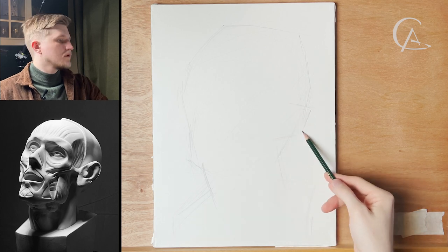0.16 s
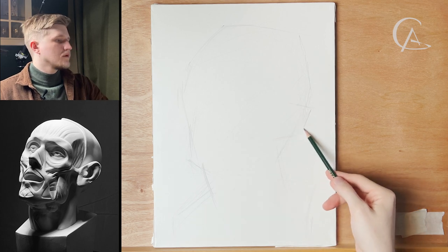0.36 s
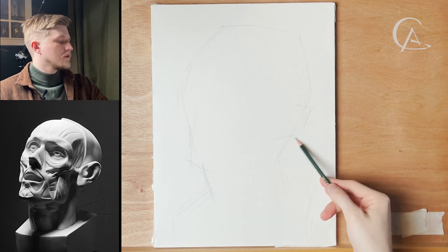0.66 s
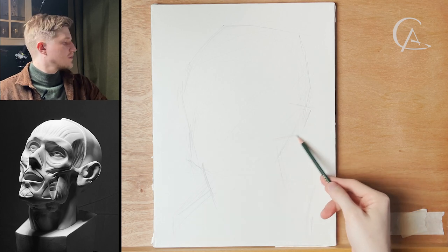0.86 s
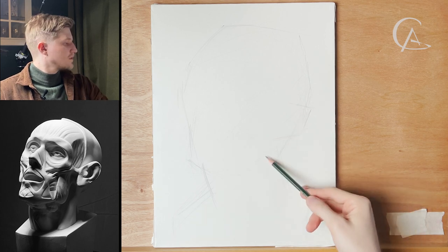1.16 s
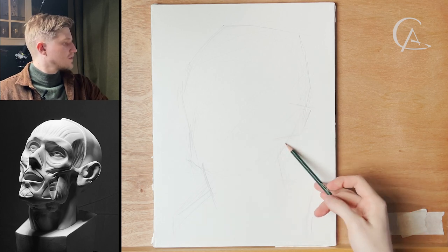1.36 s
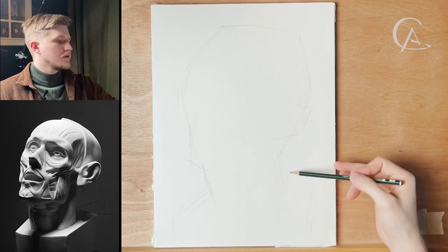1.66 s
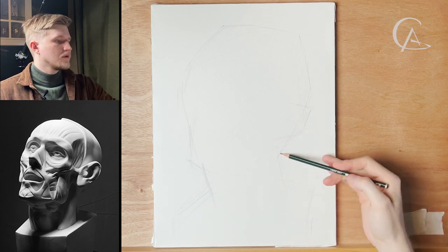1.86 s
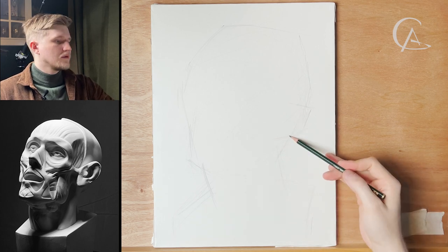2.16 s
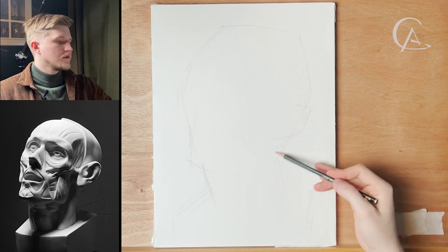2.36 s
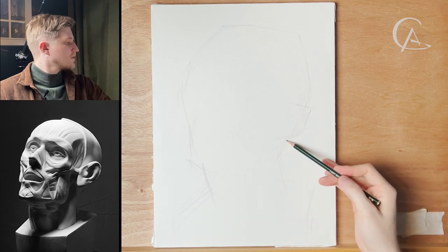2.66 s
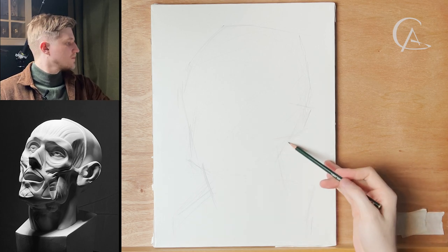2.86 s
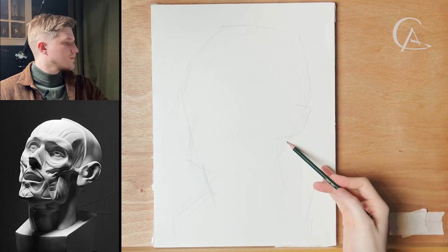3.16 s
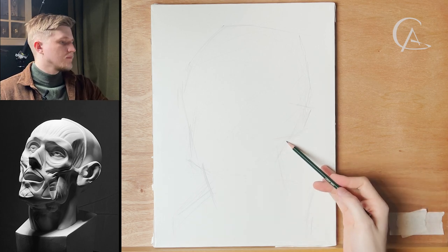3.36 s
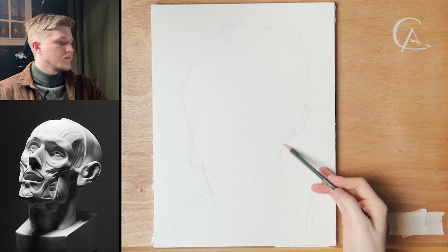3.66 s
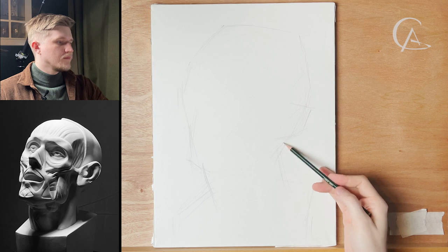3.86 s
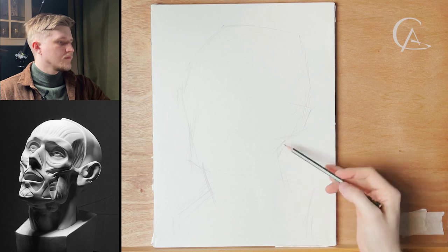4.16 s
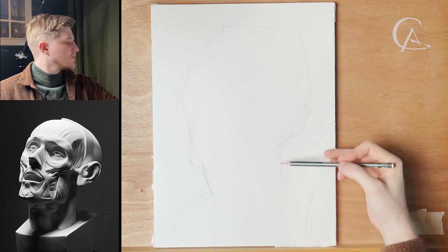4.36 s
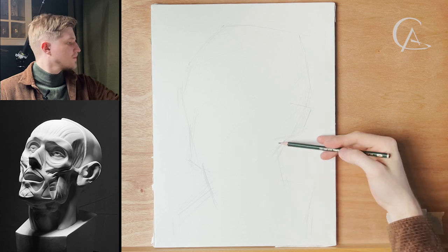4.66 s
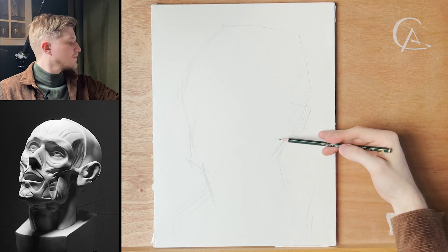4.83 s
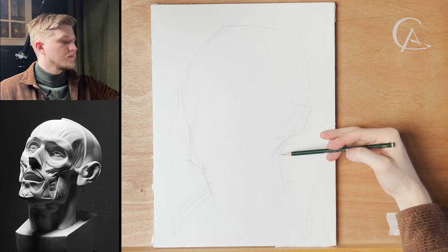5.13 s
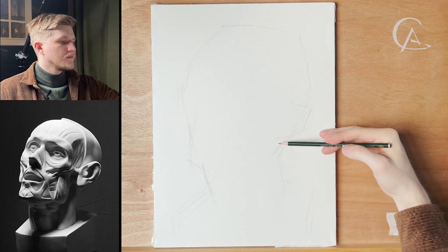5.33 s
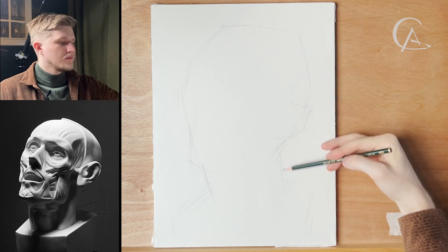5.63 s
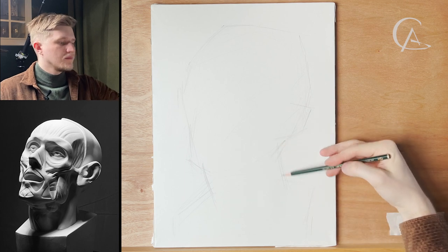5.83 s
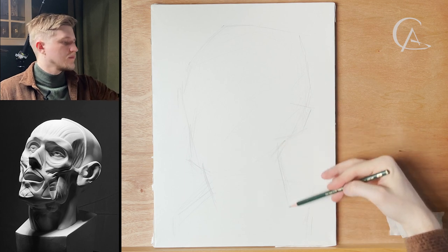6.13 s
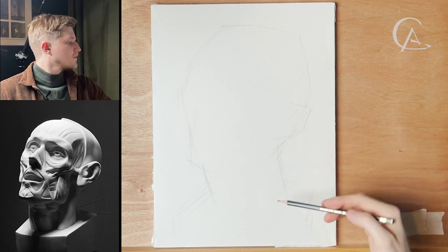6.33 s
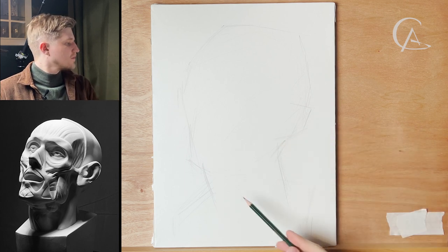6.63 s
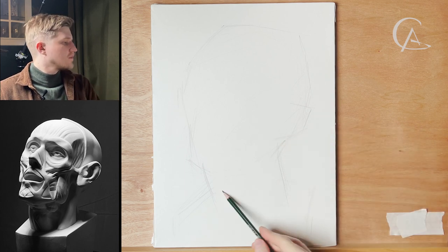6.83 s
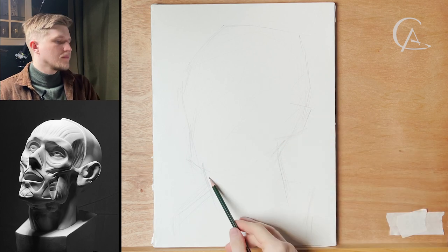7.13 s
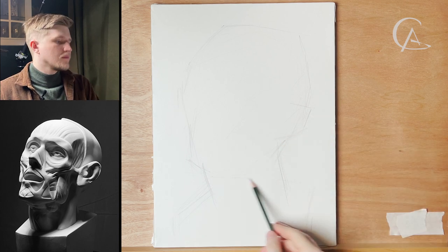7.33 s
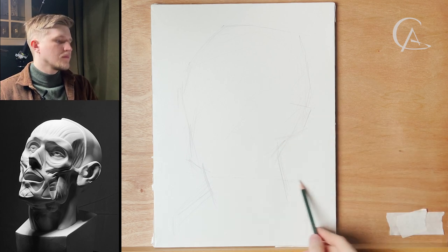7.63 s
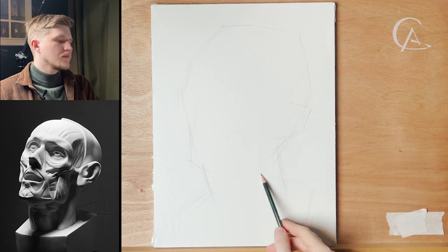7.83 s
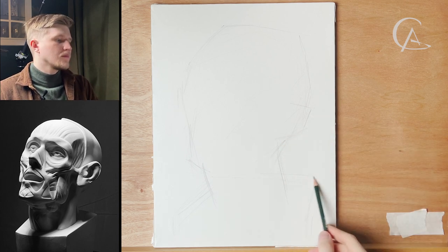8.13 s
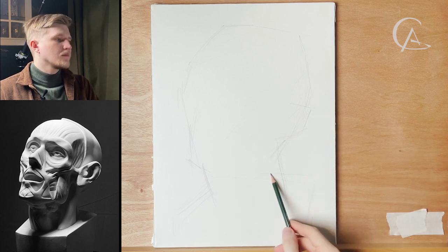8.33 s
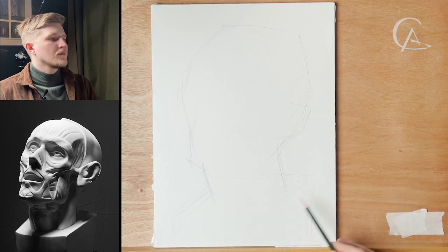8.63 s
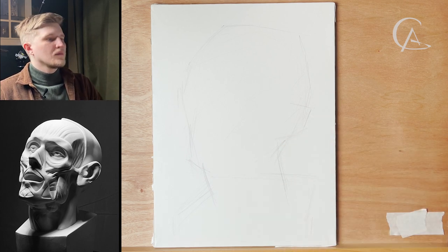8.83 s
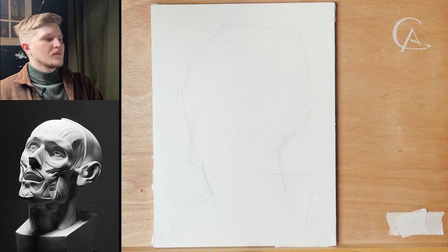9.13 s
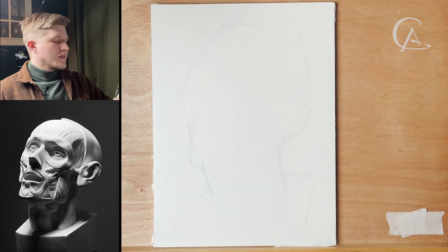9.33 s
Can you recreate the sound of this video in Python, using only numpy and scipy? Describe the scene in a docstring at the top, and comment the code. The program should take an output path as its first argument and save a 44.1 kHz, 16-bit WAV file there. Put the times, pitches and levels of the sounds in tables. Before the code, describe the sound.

A pencil sketches on paper over a wooden board in quick dry strokes with pauses, then clacks on wood and rattles briefly, over a faint low hum.

```python
"""In a quiet room, a pencil sketches on paper fixed to a wooden board, close to a small microphone.
The lead hisses over fine fibres, drums the board as it rides coarser bumps, and ticks where it lands or catches.
The hand bumps the board once, the sleeve slides over it and at the end slides off; one long faint hiss comes early.
Near the end the pencil clacks on wood and rattles to rest. Room noise and low beating hums lie underneath.
Friction is made of random tiny snaps, knocks are short bursts and ringing tones, and hums are plain tones."""
import sys
import numpy as np
from scipy import signal
from scipy.io import wavfile
from scipy.ndimage import uniform_filter1d, map_coordinates

SR = 44100
rng = np.random.default_rng(int(sys.argv[2]) if len(sys.argv) > 2 else 0)


def file_out(sig):
    """Save sig as 16-bit WAV at sys.argv[1]."""
    # one column per channel
    cols = np.atleast_2d(sig).T
    # limit, then scale
    lim = np.clip(cols, -1, 1)
    pcm = np.round(lim * 32767).astype(np.int16)
    wavfile.write(sys.argv[1], SR, pcm)


N = 418509
TIME = np.arange(N) / SR
# Table levels are relative unless marked otherwise: each function also sets the level of its whole layer.


def pencil(chatter_db=1.5, chatter_hz=220, ring_db=-44, upright_db=8):
    """The lead catches and lets go all the time, and its push on the wood makes the board ring."""
    (hiss, rasp, drum), speed, upright = hand_motion()
    push = board_drumming(drum, speed, upright)
    at_paper = lead_hiss(hiss) + lead_scratch(rasp, speed) + push + shaft_ringing(drum, speed, upright)
    grip = gain_of(chatter_db * drift(chatter_hz))
    # an upright pencil drives the board's modes harder
    drive = grip * push * gain_of(upright_db * upright)
    return grip * at_paper + gain_of(ring_db) * through(drive, board_ring())


# strokes of the pencil: (start [s], length [s], fastest at [share of length], leans hardest at [share of length],
# hiss level [dB], rasp level [dB], drumming level [dB],
# top speed [1000 = bumps heard at the pitch of their table], tilt [0 flat to 1 upright])
STROKES = [(0.426, 0.11, 0.43, .68, -42.5, -50, -61, 759, .5),
           (0.517, 0.11, 0.63, 0.57, -46, -53.5, -62.5, 703.6, 0.78),
           (0.621, 0.097, 0.52, 0.77, -42.5, -51, -54.5, 750, .4),
           (0.708, 0.12, 0.59, 0.4, -45.5, -47, -53.5, 601, 0.5),
           (0.83, .1, 0.44, 0.66, -41, -52, -48.5, 680.5, 0.62),
           (0.916, 0.11, 0.62, 0.18, -39.5, -47, -54.5, 636.8, 0.36),
           (1.025, 0.14, 0.44, 0.48, -33.5, -42.5, -36, 929.8, 0.55),
           (1.803, 0.06, 0.61, 0.53, -35.5, -37, -50.5, 650.5, 0.8),
           (1.897, 0.063, 0.56, 0.59, -45, -46.5, -58, 744, 0.77),
           (2.185, 0.16, 0.33, 0.47, -45, -48.5, -43.5, 961, 0.89),
           (3.636, .137, 0.51, 0.5, -40, -51, -41, 920.6, 0.096),
           (3.763, .17, 0.5, 0.49, -43.5, -59, -42, 781, 0.12),
           (3.945, .11, .36, 0.37, -41, -53, -37, 850.3, 0.18),
           (5.468, .315, 0.47, 0.39, -39.5, -58.5, -40.5, 941, .1),
           (5.746, .225, .58, 0.58, -39.5, -58, -40.5, 881.6, .1),
           (5.967, 0.23, 0.38, 0.41, -38, -55, -36.5, 1058, .3),
           (7.16, 0.39, .55, 0.6, -38, -42, -47, 879.7, 1),
           (7.663, .17, 0.15, 0.26, -44, -46, -51, 800, 0.84),
           (7.849, 0.25, 0.47, .35, -41, -51, -40.5, 967.4, 0.49),
           (8.113, 0.21, 0.36, 0.71, -44.5, -49.5, -47, 827, 0.64),
           (8.341, 0.21, 0.63, 0.52, -41.5, -51.5, -44, 940, 0.67)]
# light touches and brief extra presses of the lead:
# (start [s], length [s], hiss level [dB], rasp level [dB], drumming level [dB])
TOUCHES = [(-.03, 0.047, -43, -52.5, -57.5), (0.004, 0.17, -64.5, -62.5, -74.5),
           (1.267, 0.1, -80, -66, -80), (1.477, 0.079, -95, -99, -71), (2.239, 0.037, -60, -74, -43),
           (2.638, 0.09, -80, -64.5, -65.5), (2.918, 0.063, -76, -63, -66.5),
           (3.122, 0.047, -81, -60.5, -67.5), (4.48, 0.12, -73, -75, -83), (4.62, 0.13, -79, -75, -72.5),
           (4.724, 0.22, -91, -77.5, -78), (6.779, 0.059, -46.5, -51.5, -73),
           (6.857, 0.11, -56, -64.5, -73), (6.91, 0.053, -53, -59.5, -82), (7.389, 0.075, -70, -62, -43),
           (8.511, 0.034, -59, -46, -83)]


def hand_motion(touch_speed=0.95, touch_tilt=0.99, touch_crest=0.39):
    """Each stroke is one swing and one lean of the hand: gives the three strengths, the speed and the tilt."""
    hiss_power, rasp_power, drum_power = 1.29, 1.45, 1.8
    end_speed = 0.5  # share of the top speed left at either end of a stroke
    force = np.zeros((3, N))
    speed, tilt = np.full(N, touch_speed), np.full(N, touch_tilt)
    for start, length, fastest, hardest, *levels, top_speed, upright in STROKES:
        on, pace = swing(start, length, fastest)
        lean = swing(start, length, hardest)[1]
        shapes = [pace ** hiss_power, pace ** rasp_power, lean ** drum_power]
        force[:, on] += gain_of(levels)[:, None] * shapes
        speed[on] = top_speed / 1000 * (end_speed + (1 - end_speed) * pace)
        tilt[on] = upright
    for start, length, *levels in TOUCHES:
        on, pace = swing(start, length, touch_crest)
        force[:, on] += gain_of(levels)[:, None] * pace
    return force, speed, tilt


# fine fibres of the paper: (frequency [Hz], level [dB])
FIBRES = [(2000, -50), (5500, -41), (7800, -1.5), (12000, 7.5), (16000, 2.5)]


def lead_hiss(strength, hiss_db=-5):
    """The lead snaps over fine fibres, which makes a bright hiss."""
    return gain_of(hiss_db) * strength * patchy(friction(FIBRES), 3, 500, 0.025)


# rasp of the lead: (frequency [Hz], level [dB])
RASP = [(1500, -30.5), (3000, -11.5), (4200, -10.5), (5200, -4), (7000, -8.5), (12000, -15)]
# rubbing, for lead or cloth: (frequency [Hz], level [dB])
RUB = [(60, -50.5), (330, -0.5), (1250, -9.5), (1750, -1.5), (2900, -18), (4500, -12.5), (10000, -13)]


def lead_scratch(strength, speed, rasp_db=-1, scrape_db=-5):
    """The lead rasps, and fast strokes add a coarser scrape below it."""
    rasp = gain_of(rasp_db) * patchy(friction(RASP), 3.5, 700, 0.03)
    scrape = gain_of(scrape_db) * speed ** 2 * patchy(friction(RUB), 4, 450, 0.03)
    return strength * (rasp + scrape)


# coarser bumps of the paper, as heard at speed 1000: (frequency [Hz], level [dB])
BUMPINESS = [(130, -27), (330, -11.5), (750, 0), (1550, -4), (2100, -15), (4200, -33)]


def board_drumming(strength, speed, upright, drum_db=1, flat_hz=420, upright_hz=260):
    """The lead rides the coarser bumps and pushes the board; the faster it moves, the higher the pitch."""
    relief = patchy(friction(BUMPINESS, spread_db=2.6), 4.5, 260, 0.035)
    # the bumps are read at the distance that the lead has travelled
    distance = np.cumsum(speed) % (N - 1)
    ride = gain_of(drum_db) * strength * map_coordinates(relief, [distance])
    # a flat pencil passes less bass into the board
    share = np.clip(upright, 0, 1)
    return (1 - share) * without_bass(ride, flat_hz) + share * without_bass(ride, upright_hz)


# bending resonance of the pencil's shaft: (frequency [Hz], level [dB])
SHAFT = [(2000, -30), (2750, 0), (3900, -26)]


def shaft_ringing(strength, speed, upright, shaft_db=-12, upright_loss_db=7.5):
    """Hard, fast strokes set the shaft ringing, and a flat pencil rings more than an upright one."""
    level = gain_of(shaft_db - upright_loss_db * upright)
    return level * strength * speed ** 3 * patchy(friction(SHAFT), 5, 260, 0.035)


# the lead lands or catches: (time [s], level [dB], board knock compared with the tick [dB])
TICKS = [(1.278, -42, -23), (1.3587, -43, -42), (1.7619, -42, 7.5), (1.8436, -25.5, -14),
         (2.1264, -47.5, 9), (2.919, -38, 0), (4.6176, -42.5, 5), (5.399, -58, -20.5), (6.5211, -48, 7.5),
         (6.785, -27, 4.5), (7.136, -48.5, -18), (7.665, -28.5, -36), (8.5284, -31.5, -5)]
# sharp tick of the lead: (frequency [Hz], level [dB])
TICK_COLOUR = [(300, -19.5), (2500, 0), (5200, 1.5), (16000, -10)]


def lead_ticks(tick_db=-5, knock_db=-19):
    """Each sharp catch of the lead ticks and also knocks the board, which rings."""
    times, db, knock = np.transpose(TICKS)
    ticks = through(blows(times, db + tick_db), skid(TICK_COLOUR))
    return ticks + through(blows(times, db + knock + knock_db), board_ring())


# the pencil clacks against wood and rebounds: (time [s], level [dB])
CLACKS = [(8.937, -18), (8.944, -28)]
# sharp clack on wood: (frequency [Hz], level [dB])
CLACK_COLOUR = [(600, -45), (1800, 1), (2700, 9.5), (4200, -8), (5200, 8.5), (6500, -2), (8500, 9.5),
                (16000, -12)]


def pencil_clacks(clack_db=-1):
    """The pencil strikes wood and skids for a moment at each contact."""
    return gain_of(clack_db) * through(blows(*np.transpose(CLACKS)), skid(CLACK_COLOUR))


# dying rattle, bright part then woody part: (level at the first clack [dB], time to fall by 60 dB [s])
RATTLE = [(-33.5, 0.23), (-40.5, 0.52)]
# scraped wood: (frequency [Hz], level [dB])
WOOD = [(500, -14.5), (1350, -4.5), (1700, 1.5), (2050, -1.5), (2500, -1), (3300, -3.5), (4100, -6),
        (9000, -34)]


def rattle(rub_db=-2):
    """After the clack the pencil chatters to rest on the wood; the treble dies first."""
    age = TIME - CLACKS[0][0]
    bright, woody = (gain_of(db - 60 * np.maximum(age, 0) / t60) * (age > 0) for db, t60 in RATTLE)
    wood = patchy(friction(WOOD) + gain_of(rub_db) * friction(RUB), 4, 170, 0.12)
    return bright * friction(FIBRES) + woody * wood


# two contacts of the hand's one bump: (time [s], level [dB])
BUMPS = [(6.785, -38.5), (6.802, -33)]


def hand_bump(soft_hz=280, hand_damping=1.64):
    """A soft hand mostly excites the lowest modes of the board and damps them as it lies there."""
    soften = signal.butter(2, soft_hz, fs=SR, output="sos")
    flesh = signal.sosfilt(soften, blows(*np.transpose(BUMPS)))
    return through(flesh, board_ring(damping=hand_damping))


# natural tones of the board: (frequency [Hz], level [dB], time to fall by 60 dB undamped [s])
BOARD = [(174.6, -3, 0.16), (229.3, -6.5, 0.26), (272.2, 8, 0.087), (338.3, -6, 0.22), (460.4, -12, 0.093),
         (766.6, -14, 0.032)]


def board_ring(lowest_hz=150, damping=1):
    """The board answers a blow with dying tones; damping shortens them."""
    t = np.arange(SR // 2) / SR
    ring = np.zeros(len(t))
    for hz, db, t60 in BOARD:
        ring += gain_of(db - 60 * t * damping / t60) * np.sin(2 * np.pi * hz * t)
    return without_bass(ring, lowest_hz)


# slides of the sleeve over the board, except the first row, which is a long faint hiss around 2 kHz:
# (start [s], length [s], fastest or loudest at [share of length],
# swish level [dB], rub level [dB], scrape level on the wooden edge [dB])
SLIDES_AND_FAINT_HISS = [(1.646, 2.5, 0.17, -96, -96, -75.5), (6.492, 0.11, 0.63, -80, -61.5, -53.5),
                         (6.519, 0.051, 0.13, -44, -50, -58), (8.556, 0.54, 0.57, -47, -60, -60),
                         (8.988, 0.15, .4, -67, -56, -60.5), (9.074, 0.9, 0.28, -83, -69.5, -69.5),
                         (9.315, .11, 0.7, -55, -56, -68), (9.393, 0.086, 0.48, -80, -86, -59.5)]


def sleeve_and_faint_hiss(swish_db=-5, swish_power=4.1):
    """Cloth swishes, rubs the board and scrapes its wooden edge; a long faint hiss shares the scrape's sound."""
    force = np.zeros((3, N))
    for start, length, crest, *levels in SLIDES_AND_FAINT_HISS:
        on, pace = swing(start, length, crest)
        # the swish grows more steeply with speed than the rub
        force[:, on] += gain_of(levels)[:, None] * [pace ** swish_power, pace, pace]
    swish, rub, scrape = force
    catches = patchy(friction(RUB, per_s=4000, spread_db=3.8), 2.5, 170, 0.12)
    edge = patchy(friction(WOOD, per_s=4000, spread_db=3), 4, 170, 0.12)
    return gain_of(swish_db) * swish * friction(FIBRES) + rub * catches + scrape * edge


# echo of the room: (frequency [Hz], time to fall by 60 dB [s])
ROOM = [(150, 0.33), (2000, 0.21), (12000, 0.17)]


def room(x, gap_s=0.0039):
    """Dense reflections of a small room, each band dying at its own speed."""
    hz, t, z = signal.stft(rng.standard_normal(SR // 2), SR, nperseg=256)
    fade = gain_of(-60 * t / read(ROOM, hz)[:, None])
    tail = signal.istft(z * fade, SR, nperseg=256)[1]
    # silent for one gap, then growing to full over another
    tail = tail * np.clip(np.arange(len(tail)) / SR / gap_s - 1, 0, 1)
    return through(x, tail / np.linalg.norm(tail))


# noise of the quiet room: (frequency [Hz], level [dB])
AIR = [(20, -14.5), (68, -4), (125, 0.5), (300, -2), (430, -10.5), (650, -11), (850, -23), (1250, -17),
       (1700, -32), (16000, -38.5)]


def room_noise(air_db=-66):
    """Soft shaped noise whose level wanders a little."""
    air = evened(through(rng.standard_normal(N), response(AIR)))
    return gain_of(air_db) * air * gain_of(drift(2.1))


# low steady hums, and one faint higher tone of the room: (frequency [Hz], rms level [dB])
HUMS = [(100.0, -61.5), (97.57, -64.5), (48.8, -77), (342, -70)]


def hums(in_step_s=0.17, waver_rad=0.12):
    """Steady tones with slightly wavering phase; the closest two swell together and cancel in turn."""
    total = np.zeros(N)
    for hz, db in HUMS:
        phase = 2 * np.pi * hz * (TIME - in_step_s) + waver_rad * drift(4)
        total += gain_of(db) * np.sqrt(2) * np.cos(phase)
    return total


def friction(colour, per_s=9000, spread_db=1.0):
    """Tiny snaps: random in time, mostly small, a few large."""
    size = gain_of(spread_db * np.minimum(rng.exponential(1, N), 4.5))
    snaps = size * rng.choice([-1, 1], N) * (rng.random(N) < per_s / SR)
    return evened(through(snaps, response(colour)))


def patchy(x, depth_db, width_hz, length_s):
    """Uneven surface: each moment favours other pitches, at about the same power."""
    z = signal.stft(x, SR, nperseg=512)[2]
    field = rng.standard_normal(z.shape)
    # smooth the chance over patches so wide in pitch and so long in time
    for axis, span in enumerate((width_hz * 512 / SR, length_s * SR / 256)):
        field = uniform_filter1d(field, max(1, round(span)), axis)
    z = z * gain_of(depth_db * evened(field))
    power = uniform_filter1d((abs(z) ** 2).sum(0), size=3)
    return evened(signal.istft(z / np.sqrt(power + 1e-12), SR)[1][:N])


def swing(start, length, crest):
    """A smooth rise and fall: the samples of one movement, and an arch from 0 to 1 and back."""
    on = (TIME > start) & (TIME < start + length)
    # bend time so that the arch tops at the crest
    skew = np.log(0.5) / np.log(np.clip(crest, 0.05, 0.95))
    return on, abs(np.sin(np.pi * ((TIME[on] - start) / length) ** skew))


def skid(colour):
    """A contact skids for a moment: a short dying noise with this spectrum and a peak of 1."""
    t = np.arange(SR // 50) / SR
    burst = rng.standard_normal(len(t)) * np.exp(-t / 0.0018)
    shaped = signal.fftconvolve(burst, response(colour))
    return shaped / abs(shaped).max()


def blows(times, db):
    """One impulse for each blow."""
    out = np.zeros(N)
    out[np.round(np.asarray(times) * SR).astype(int)] = gain_of(db)
    return out


def without_bass(x, edge_hz):
    """A small board radiates little below its lowest modes."""
    return signal.sosfilt(signal.butter(2, edge_hz, "high", fs=SR, output="sos"), x)


def drift(rate_hz):
    """Random wandering of rms 1, with a new target this many times a second."""
    knots = rng.standard_normal(N // 20)
    return evened(np.interp(TIME * rate_hz, np.arange(len(knots)), knots))


def gain_of(db):
    """Decibels to amplitude."""
    return 10 ** (np.asarray(db) / 20)


def evened(x):
    """Scales to rms 1."""
    return x / np.sqrt(np.mean(x ** 2) + 1e-20)


def read(points, hz):
    """Reads a table on a log-frequency axis."""
    f, value = np.transpose(points)
    return np.interp(np.log(hz + 1), np.log(f + 1), value)


def response(points, size=4096):
    """The impulse response that has this spectrum and never starts before its cause."""
    log_gain = np.log(gain_of(read(points, abs(np.fft.fftfreq(size, 1 / SR)))))
    return np.fft.ifft(np.exp(np.conj(signal.hilbert(log_gain)))).real[:size // 2]


def through(x, impulse):
    """Convolves and keeps the scene's length."""
    return signal.oaconvolve(x, impulse)[:N]


def scene(room_db=-8):
    """The near sounds, their echo, and the quiet room."""
    near = pencil() + lead_ticks() + pencil_clacks() + hand_bump() + rattle() + sleeve_and_faint_hiss()
    # the sound feeds two different echoes in turn, in a cycle of one second
    turn = 2 * np.pi * TIME
    echo = room(near * np.cos(turn)) + room(near * np.sin(turn))
    return (near + gain_of(room_db) * echo + room_noise() + hums())[None]


# the microphone's treble: (frequency [Hz], gain [dB])
MICROPHONE = [(7200, 0.5), (8500, 8.5), (9850, 0.5), (10230, -20), (10550, 1), (11300, 11), (12000, 3),
              (13600, -30.5), (14500, -18.5)]


def record(dry, edge_hz=15850):
    """The microphone's peaks and notches in the treble, then a steep cut above the edge."""
    coloured = through(dry[0], response(MICROPHONE))
    band_limit = signal.firwin(511, edge_hz, window=("kaiser", 9), fs=SR)
    return signal.oaconvolve(coloured, band_limit, "same")[None]


dry = scene()
out = record(dry)
file_out(out)
```